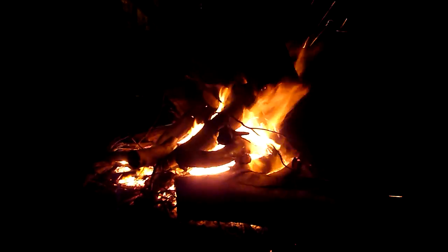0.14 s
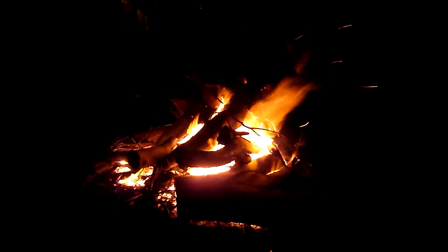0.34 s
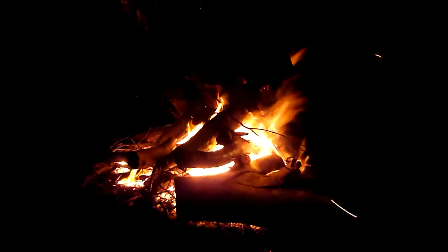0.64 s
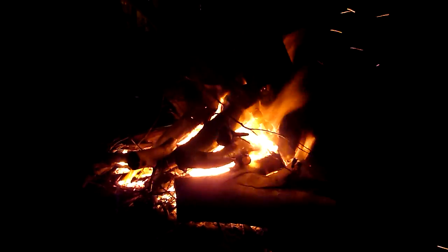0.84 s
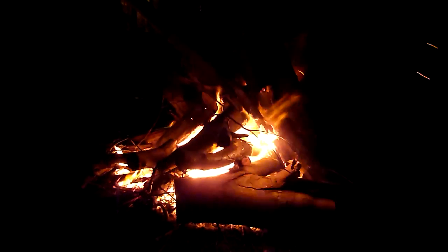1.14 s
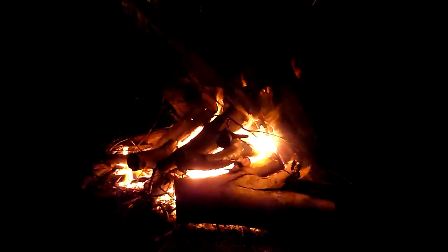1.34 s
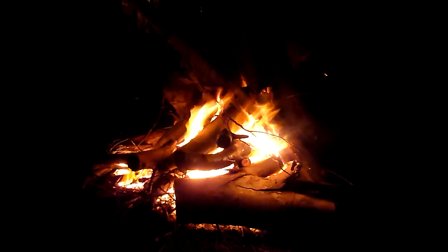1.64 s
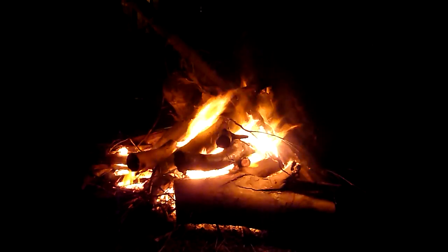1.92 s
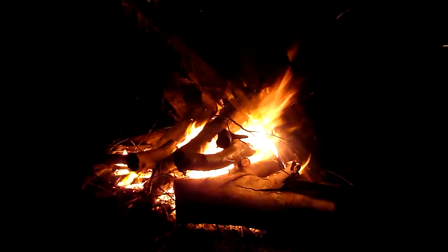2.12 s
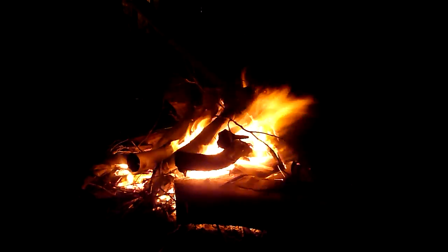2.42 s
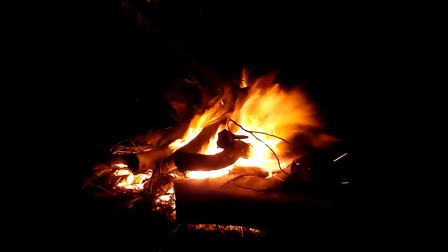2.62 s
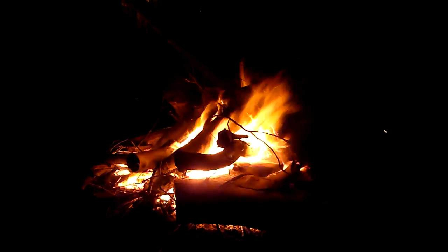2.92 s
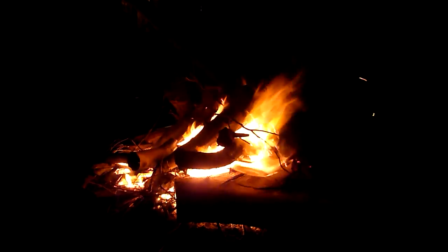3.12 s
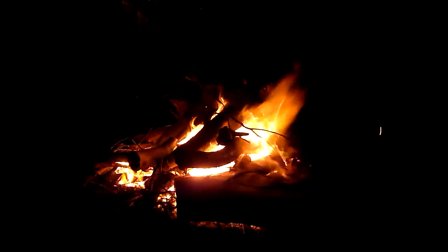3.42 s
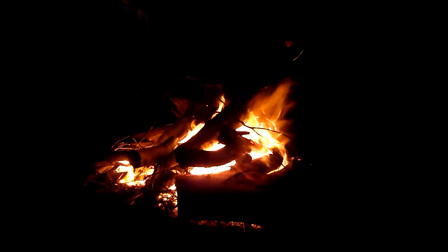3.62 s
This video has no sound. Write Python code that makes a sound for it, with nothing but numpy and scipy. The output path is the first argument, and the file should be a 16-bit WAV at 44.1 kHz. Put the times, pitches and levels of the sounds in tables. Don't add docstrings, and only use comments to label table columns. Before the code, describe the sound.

A log fire hisses steadily at night with sharp snaps, small pops and low wind flutters

```python
import sys
import numpy as np
from scipy import signal
from scipy.io import wavfile

SR = 44100
rng = np.random.default_rng(int(sys.argv[2]) if len(sys.argv) > 2 else 0)


def natural_amplitude(level_db):
    exponent = np.asarray(level_db, float) / 20
    return 10 ** exponent


def master_out(mix):
    frames = np.transpose(np.atleast_2d(mix))
    ceiling = np.clip(frames, -1, 1)
    pcm = np.round(ceiling * 32767).astype(np.int16)
    wavfile.write(sys.argv[1], SR, pcm)


N = 165816

# freq_hz, likeness
LIKENESS = [(60, -0.047), (150, 0.87), (300, 0.46), (640, -0.21), (1400, -0.43), (3100, 0.51), (6800, 0.77),
            (15000, 0.78)]
# freq_hz, lead_db
LEFT_LEAD = [(300, -0.9), (2000, 0.5), (4500, -0.1), (8500, 3.5), (13000, 0.5)]
# freq_hz, density_db_per_hz
HISS_SPECTRUM = [(400, 0), (1200, 1), (1900, -1), (3500, -2.5), (5500, -3.5), (8500, -1), (11500, -2),
                 (14500, -6)]
# freq_hz, width_hz, depth_0_to_1
GROUND_DIPS = [(1424, 235, 0.42), (1933, 203, 0.55), (2554, 240, 0.43)]
# start_s, peak_db, low_ring_hz, ring_vs_crack_db, high_ring_hz
POPS = [(0.0005, -19.5, 600, -3, 1290), (0.0665, -28, 1150, -3, 1700), (1.3402, -14.5, 4470, -17, 8000),
        (1.45, -24, 1020, -3, 2230), (1.484, -32, 1470, 3, 2380), (1.586, -29, 990, -6, 1830),
        (1.6315, -23, 1010, -6, 2890), (2.0944, -26.5, 1200, -5.5, 3020), (2.138, -33, 910, -5, 1300),
        (2.4072, -23, 1280, -9, 1820), (2.646, -26.5, 1210, -15, 1240), (2.957, -31.5, 556, 8, 910),
        (3.118, -21, 1170, -16, 3340), (3.192, -27, 1720, -4, 1660), (3.516, -22, 5000, -9, 8000),
        (3.528, -22, 1010, -10, 4460)]
# centre_s, length_s, level_db, flutter_hz
EDDIES_LEFT = [(0.013, 0.067, -20, 115.5), (0.05, 0.0043, -1.5, 115), (0.073, 0.01, -14, 89.0),
               (0.104, 0.017, -14, 166), (0.187, 0.014, -22, 103), (0.225, 0.021, -15.5, 94),
               (0.254, 0.02, -26, 149), (0.345, 0.012, -20, 115), (0.703, 0.007, -22.5, 119),
               (0.72, 0.026, -22, 127), (0.87, 0.0087, -21, 122), (1.037, 0.015, -20.5, 104),
               (1.062, 0.03, -26.5, 124), (1.289, 0.011, -25, 118), (1.31, 0.014, -17, 183),
               (1.357, 0.019, -11.5, 157), (1.384, 0.045, -22.5, 150), (1.446, 0.028, -28, 121),
               (1.603, 0.023, -27.5, 149), (1.647, 0.026, -24, 132), (1.888, 0.0056, -20.5, 161),
               (1.923, 0.028, -22, 144), (2.425, 0.01, -23, 92.0), (3.097, 0.032, -23.5, 143),
               (3.525, 0.02, -29, 132), (3.564, 0.024, -30, 125), (3.598, 0.07, -35, 168),
               (3.68, 0.022, -27.5, 136), (3.716, 0.0092, -24, 178), (3.732, 0.016, -12, 129)]
# centre_s, length_s, level_db, flutter_hz
EDDIES_RIGHT = [(0.015, 0.025, -17.5, 124), (0.052, 0.039, -18.5, 108), (0.095, 0.036, -27, 134),
                (0.13, 0.0077, -19.5, 128.0), (0.229, 0.022, -20.5, 157), (0.348, 0.016, -21.5, 120),
                (0.483, 0.021, -27, 120), (0.705, 0.019, -24, 141), (0.863, 0.012, -26, 122),
                (1.035, 0.063, -25.5, 98.5), (1.268, 0.037, -30, 88.0), (1.291, 0.017, -17, 132),
                (1.327, 0.013, -12, 210), (1.36, 0.016, -17, 170), (1.404, 0.014, -16.5, 102),
                (1.581, 0.037, -27, 121), (1.648, 0.056, -27, 162), (1.901, 0.022, -24.5, 116),
                (1.949, 0.037, -26, 86), (1.988, 0.019, -24.5, 79.4), (2.015, 0.024, -22, 105),
                (2.308, 0.028, -28.5, 93), (2.384, 0.035, -30, 89), (2.483, 0.014, -26, 141),
                (3.093, 0.0076, -24, 122), (3.52, 0.025, -20.5, 123), (3.548, 0.015, -23, 120),
                (3.595, 0.039, -24, 135), (3.686, 0.08, -30.0, 138), (3.73, 0.02, -14, 138)]
# centre_s, length_s, level_db, flutter_hz
FURTHER_EDDIES_LEFT = [
    (1.327, 0.015, -16, 249),
    (1.414, 0.017, -28, 169),
    (2.12, .03, -34, 89),
    (3.05, 0.023, -36, 112),
    (.3, 0.023, -31, 100),
    (1.55, 0.025, -38, 130),
]
# centre_s, length_s, level_db, flutter_hz
FURTHER_EDDIES_RIGHT = [
    (1.311, 0.019, -20, 194),
    (1.344, 0.013, -17.5, 130),
    (1.385, 0.029, -25, 200),
    (1.415, 0.0069, -19, 172),
    (2.15, 0.045, -40, 88),
    (3.25, 0.017, -36, 90),
]
# time_s, level_db
BREEZE_LEVEL = [(0, -29), (.3, -38), (.55, -39.5), (.78, -39.5), (.95, -43), (1.15, -44.5), (1.5, -37.5),
                (1.7, -38), (1.8, -47), (2.1, -44.5), (2.25, -42.5), (2.52, -39.5), (2.75, -45),
                (2.95, -42), (3.05, -42), (3.2, -41), (3.38, -42), (3.6, -37.5)]
# freq_hz, density_db_per_hz
BREEZE_SPECTRUM = [(25, -5), (50, 3), (110, -2), (200, -0.5), (300, -9), (450, -20), (900, -50)]
# centre_s, peak_db, swing_hz
SLAPS = [
    (1.329, -15, 300),
    (1.327, -27, 620),
    (1.323, -24, 400),
    (1.311, -25, 480),
    (.222, -30, 330),
    (.05, -30, 380),
    (1.915, -31, 300),
    (3.512, -31, 330),
    (3.73, -30, 330),
]
# start_s, peak_db
SNAPS = [
    (1.1187, -12),
    (1.1981, -9.5),
    (2.4049, -13.5),
]
# ring_hz, level_db, ring_cycles
SNAP_RINGS = [
    [(565, -13, 4), (1010, -15, 7), (3210, -12, 12), (4500, -4, 18), (6050, -10, 44), (7140, -1, 40),
     (8600, 0, 19), (9600, -9, 47), (14450, -13, 60)],
    [(600, -10, 2.5), (1255, -14, 16), (3400, 0, 9), (4640, -16, 34), (5800, -15, 42), (6450, -9, 45),
     (8100, -4, 20), (10700, -5, 26), (12750, -14, 56)],
    [(600, -5, 2.5), (1760, -7, 13), (2150, -7, 16), (4200, 1, 11), (5460, -8, 40), (6900, -5, 38),
     (8140, -3, 30), (9230, -9, 50), (13600, -2, 33)],
]
# start_s, depth_db, hold_s
DUCKS = [
    (0.045, 7.5, .04),
    (0.224, 2, 0.086),
    (1.344, 4, 0.069),
    (1.93, 1, 0.09),
    (3.739, 2.5, .066),
]

HISS_DB, HISS_FADE_DB_PER_S = -38.5, .3
BOUNCE_S, BOUNCE_GAIN = .000707, .13
TICKS_PER_S, TICK_DB, TICK_CYCLES = 60, -58, 5.0
CRACK_RISE_S, CRACK_FALL_S, CRACK_LOW_HZ, CRACK_TOP_RATIO = .0002, .001, 200, 3.8
POP_RING_CYCLES, POP_SPREAD = 12, .35
EDDY_WIDTH, EDDY_WOBBLE, EDDY_PUSH, EDDY_DB = 0.48, 0.35, 0.35, 4.5
STEEP_BASE, STEEP_PER_DB = .35, .01
PORT_LOW_HZ, EDDY_TOP_HZ, EDGE_HZ = 42, 560, 260
EDDY_CROSS, EDGE_CROSS = 0.023, -.2
SLAP_S, SLAP_STEEP, SLAP_LEFT = .0032, 1.3, .3
SPLINTER_S, SPLINTER_GAIN, SPLINTER_DB = .0006, .4, -24
JET_START_S, JET_FULL_S, JET_END_S, JET_DB = 1.26, 1.51, 1.78, -45.5
WHISTLE_HZ, WHISTLE_WIDTH_HZ, WHISTLE_GAIN = 2300, 150, 1.3
DUCK_ATTACK_S, DUCK_RELEASE_S, START_DUCK_DB = 0.012, 0.063, 7
TOP_CUT_HZ = 15740
OPPOSED = np.array([[1], [-1]])


def rms_one(x):
    return x / np.sqrt(np.mean(x ** 2) + 1e-20)


def at_hz(points, hz):
    table_hz, values = np.array(points)[:, 0], np.array(points)[:, 1]
    return np.interp(np.log(hz), np.log(table_hz), values)


def drift(rate_hz):
    pole = np.exp(-80 * np.pi * rate_hz / SR)
    white = rng.standard_normal(N // 40 + 2002)
    slow = signal.lfilter([1], [1, -2 * pole, pole * pole], white)[2000:]
    return np.interp(np.arange(N) / 40, np.arange(len(slow)), rms_one(slow))


def ring(clicks, hz, t60_s):
    pole, turn = natural_amplitude(-60 / (t60_s * SR)), 2 * np.pi * hz / SR
    return signal.lfilter([0, np.sin(turn)], [1, -2 * pole * np.cos(turn), pole * pole], clicks + 1e-18)


def bandpass(x, low_hz, high_hz):
    return signal.sosfilt(signal.butter(2, [low_hz, high_hz], "band", fs=SR, output="sos"), x)


def banded_noise(spectrum, edges_hz, shared_db, own_db, shared_rate_hz, own_rate_hz):
    out, together = 0, drift(shared_rate_hz)
    white = rng.standard_normal((2, 2, N + 8000))
    for k, (low_hz, high_hz) in enumerate(zip(edges_hz, edges_hz[1:])):
        mid, side = bandpass(white[k % 2], low_hz, high_hz)[:, 8000:]
        hz = np.sqrt(low_hz * high_hz)
        alike = np.clip(at_hz(LIKENESS, hz), -1, 1)
        gain = natural_amplitude(at_hz(spectrum, hz) + shared_db * together + own_db * drift(own_rate_hz))
        stereo = np.sqrt(1 + alike) * mid + np.sqrt(1 - alike) * side * OPPOSED
        out = out + gain * stereo * natural_amplitude(at_hz(LEFT_LEAD, hz) / 2 * OPPOSED)
    return rms_one(out)


def hiss():
    x = banded_noise(HISS_SPECTRUM, 200 * 2 ** np.arange(0, 6.7, .3), shared_db=1.0, own_db=.5,
                     shared_rate_hz=14, own_rate_hz=1.36)
    for hz, width_hz, depth in GROUND_DIPS:
        peak = signal.lfilter(*signal.iirpeak(hz, hz / width_hz, fs=SR), x)
        x = x - np.clip(depth, 0, 1) * peak
    bright = signal.sosfiltfilt(signal.butter(2, 5000, "high", fs=SR, output="sos"), x)
    x = x + BOUNCE_GAIN * np.roll(bright, round(BOUNCE_S * SR), axis=1)
    return natural_amplitude(HISS_DB + 2.5 - HISS_FADE_DB_PER_S * np.arange(N) / SR) * x


def ticks():
    happens = rng.random(N) < TICKS_PER_S / SR
    sizes = natural_amplitude(4.3 * np.minimum(rng.exponential(1, N), 2)) * rng.choice([-1, 1], N) * happens
    dealt = rng.integers(0, 12, N)
    out = 0
    for k, hz in enumerate(np.geomspace(700, 9000, 12)):
        out = out + ring(sizes * (dealt == k), hz, TICK_CYCLES / hz)
    return natural_amplitude(TICK_DB + 17) * out


def pops():
    out, t = np.zeros((2, N + 2000)), np.arange(2000) / SR
    burst = (1 - np.exp(-t / CRACK_RISE_S)) * np.exp(-t / CRACK_FALL_S)
    noise = rng.standard_normal((len(POPS), 2, len(t)))
    for (s, db, low_hz, ring_db, high_hz), (mid, side) in zip(POPS, noise):
        splinters = burst * (mid + POP_SPREAD * side * OPPOSED)
        crack = bandpass(splinters, CRACK_LOW_HZ, min(CRACK_TOP_RATIO * high_hz, .45 * SR))
        note = 0
        for hz in (low_hz, high_hz):
            push = burst * np.abs(mid) * np.sin(2 * np.pi * hz * t)
            note = note + ring(push, hz, POP_RING_CYCLES / hz) * hz ** 0.6
        pop = crack / np.abs(crack).max() + natural_amplitude(ring_db) * note / np.abs(note).max()
        out[:, int(s * SR):int(s * SR) + len(t)] += natural_amplitude(db) * pop / np.abs(pop).max()
    return out[:, :N]


def eddies(table):
    out, t = np.zeros(N), np.arange(N) / SR
    chance = rng.uniform(-1.2, 1, (len(table), 5))
    for (s, length_s, db, hz), (a, b, c, d, e) in zip(table, chance):
        near = slice(max(0, int((s - 3 * length_s) * SR)), int((s + 3 * length_s) * SR))
        u = (t[near] - s) / (EDDY_WIDTH * length_s)
        wobble = np.sin(2.59 * u + np.pi * c) + .5 * np.sin(5.43 * u + np.pi * b)
        turn = 2 * np.pi * hz * (t[near] - s) + EDDY_WOBBLE * min(hz * length_s, 4.0) * wobble
        steep = max(STEEP_BASE + STEEP_PER_DB * (db + 25), 0)
        swing = np.sin(turn + np.pi * a + steep * np.sin(turn + np.pi * d))
        swing = swing + EDDY_PUSH * np.sin(turn / 2 + np.pi * e)
        bell = np.exp(-u ** 2)
        balanced = swing - np.sum(swing * bell) / np.sum(bell)
        out[near] += natural_amplitude(db + EDDY_DB) * bell * balanced
    return out


def slaps():
    out, t = np.zeros(N), np.arange(N) / SR
    for s, db, hz in SLAPS:
        turn = 2 * np.pi * hz * (t - s)
        swing = np.cos(turn + SLAP_STEEP * np.sin(turn + 1) ** 3)
        out += natural_amplitude(db) * swing * np.exp(-((t - s) / SLAP_S) ** 2)
    return out * np.array([[-SLAP_LEFT], [1]])


def wind():
    main = np.array([eddies(EDDIES_LEFT), eddies(EDDIES_RIGHT)])
    further = np.array([eddies(FURTHER_EDDIES_LEFT), eddies(FURTHER_EDDIES_RIGHT)])
    band = signal.butter(2, [PORT_LOW_HZ, EDDY_TOP_HZ], "band", fs=SR, output="sos")
    both = signal.sosfiltfilt(band, main + further)
    edges = signal.sosfilt(signal.butter(2, EDGE_HZ, "high", fs=SR, output="sos"), both)
    crossed = (EDDY_CROSS * both + EDGE_CROSS * edges)[::-1]
    flutter = banded_noise(BREEZE_SPECTRUM, 22 * 2 ** np.arange(0, 5.6, .5), shared_db=1.5, own_db=1.2,
                           shared_rate_hz=25, own_rate_hz=10)
    level_db = np.interp(np.arange(N) / SR, *np.transpose(BREEZE_LEVEL))
    return both + crossed + slaps() + natural_amplitude(level_db) * flutter


def snaps():
    out, t = np.zeros((2, N + 2000)), np.arange(2000) / SR
    noise = rng.standard_normal((len(SNAPS), 2, len(t)))
    for (s, db), rings, (mid, side) in zip(SNAPS, SNAP_RINGS, noise):
        clicks = natural_amplitude(SPLINTER_DB) * np.exp(-t / CRACK_FALL_S) * (mid + side * OPPOSED)
        clicks[:, [0, round(SPLINTER_S * SR)]] += [1, SPLINTER_GAIN]
        snap = 0
        for k, (hz, ring_db, cycles) in enumerate(rings):
            snap = snap + (-1) ** k * natural_amplitude(ring_db) * ring(clicks, hz, cycles / hz)
        out[:, int(s * SR):int(s * SR) + len(t)] += natural_amplitude(db) * snap / np.abs(snap).max()
    return out[:, :N]


def jet():
    x = bandpass(rng.standard_normal(N), 700, 4000)
    whistle = signal.lfilter(*signal.iirpeak(WHISTLE_HZ, WHISTLE_HZ / WHISTLE_WIDTH_HZ, fs=SR), x)
    swell = np.interp(np.arange(N) / SR, [JET_START_S, JET_FULL_S, JET_END_S], [0, 1, 0])
    return natural_amplitude(JET_DB + 1.2 * drift(26)) * swell * rms_one(x + WHISTLE_GAIN * whistle)


def scene():
    return hiss() + ticks() + pops() + wind() + snaps() + jet()


def band_limit(x):
    return signal.sosfilt(signal.butter(12, 15880, fs=SR, output="sos"), x)


def record(dry):
    t = np.arange(N) / SR
    first_s = DUCKS[0][0]
    duck_db = START_DUCK_DB * (t < first_s) * np.clip(1 - t / first_s, 0, 1)
    for s, depth_db, hold_s in DUCKS:
        rise = 1 - np.exp(-np.maximum(t - s + 2 * DUCK_ATTACK_S, 0) / DUCK_ATTACK_S)
        release = np.exp(-np.maximum(t - s - hold_s, 0) / DUCK_RELEASE_S)
        duck_db = duck_db + depth_db * rise * release
    low_pass = signal.ellip(12, .5, 75, TOP_CUT_HZ, fs=SR, output="sos")
    mix = signal.sosfilt(low_pass, dry * natural_amplitude(-duck_db))
    return band_limit(mix)


dry = scene()
out = record(dry)
master_out(out)
```